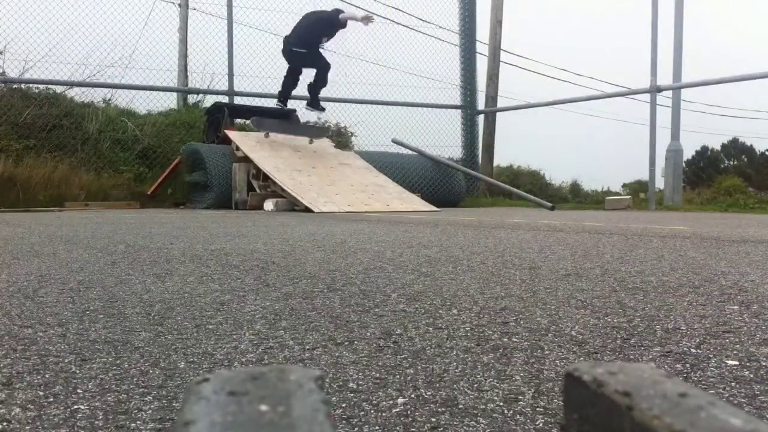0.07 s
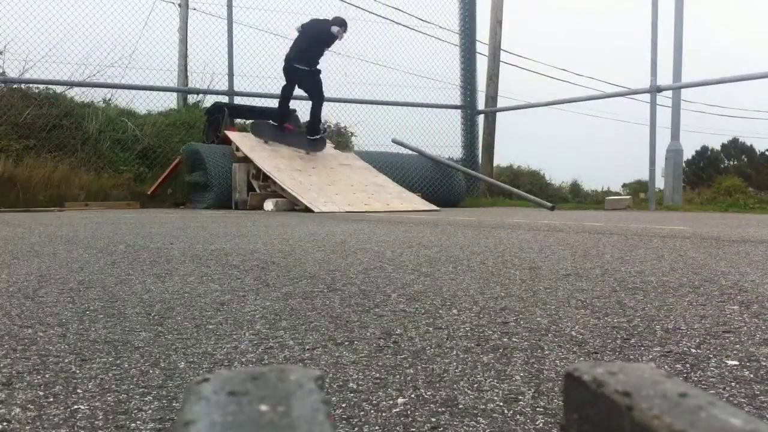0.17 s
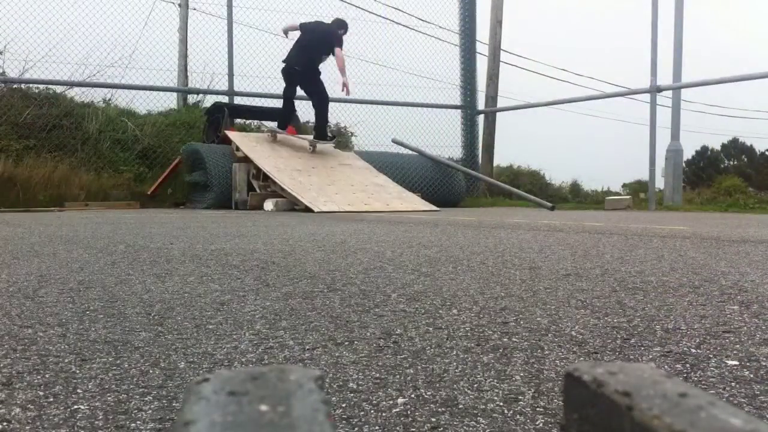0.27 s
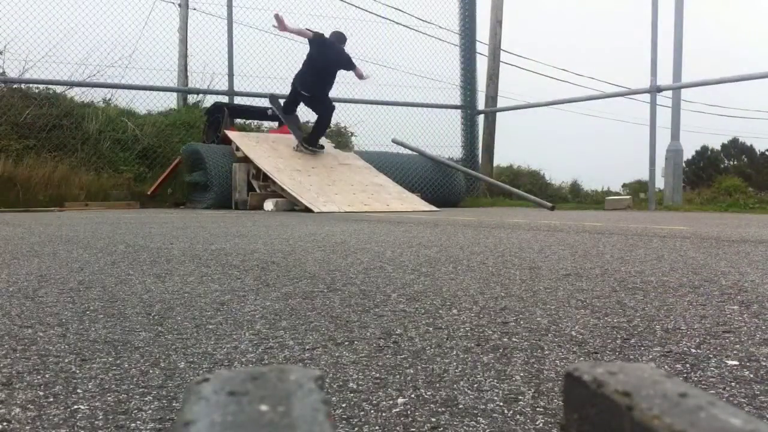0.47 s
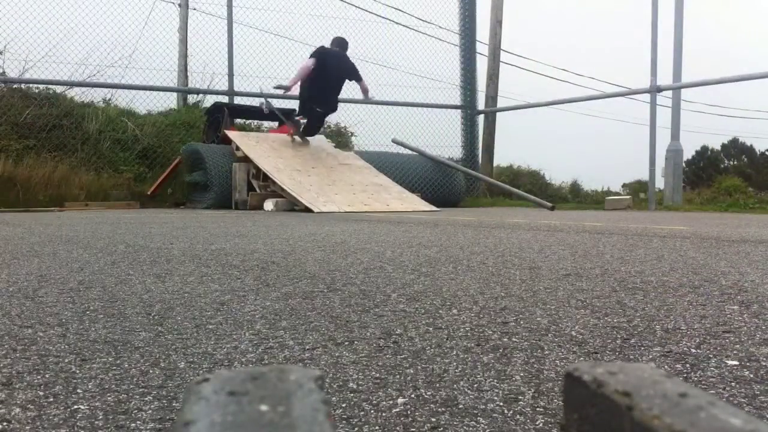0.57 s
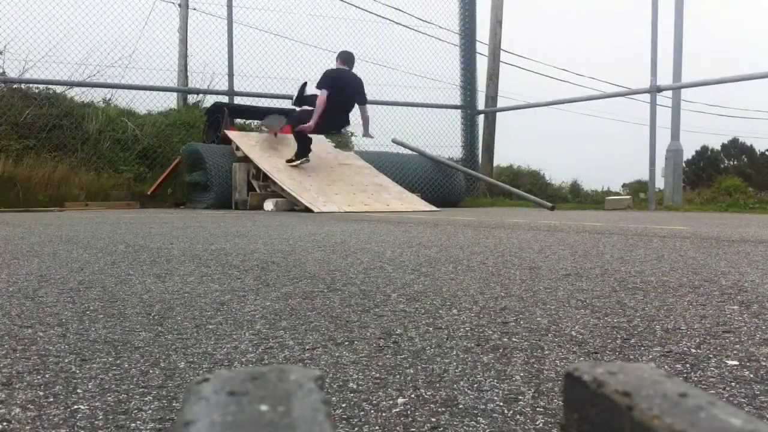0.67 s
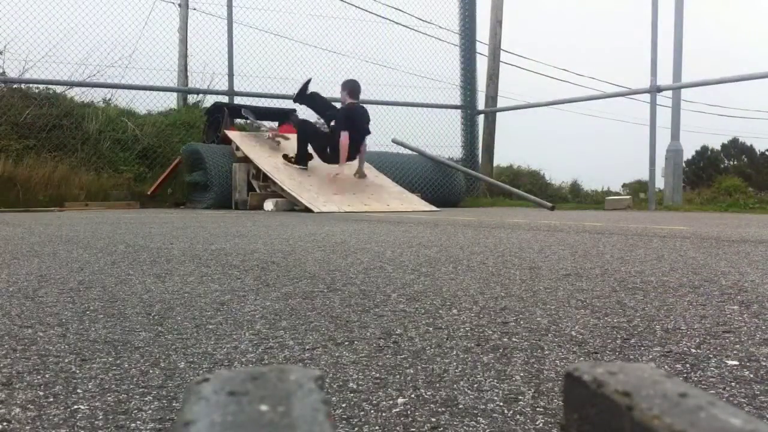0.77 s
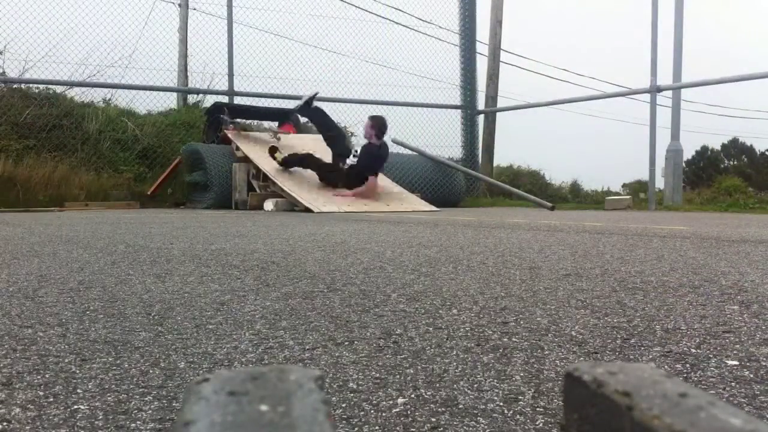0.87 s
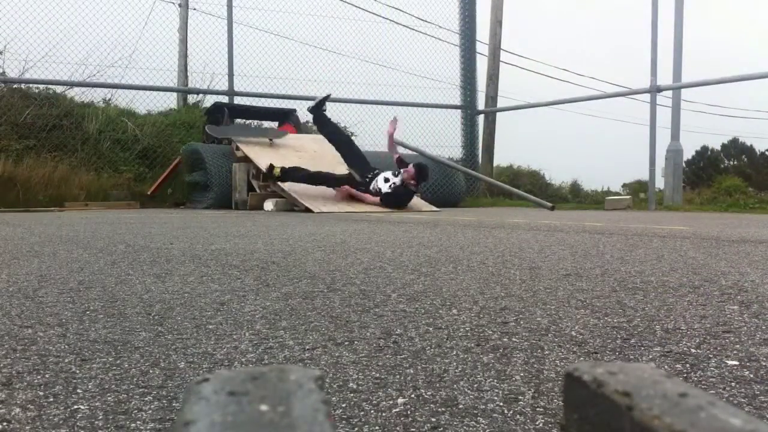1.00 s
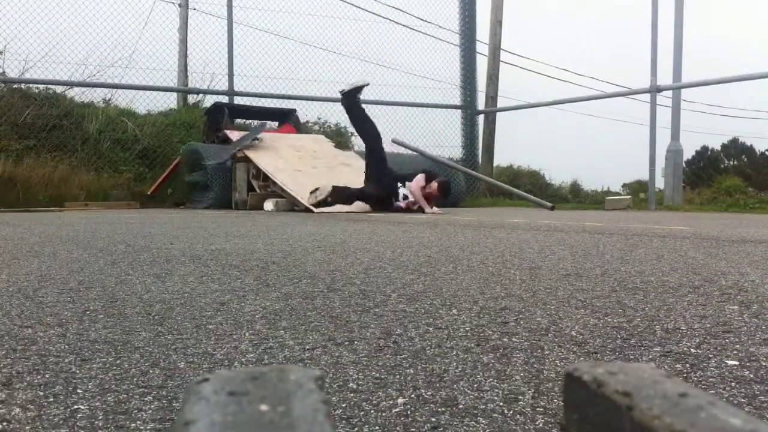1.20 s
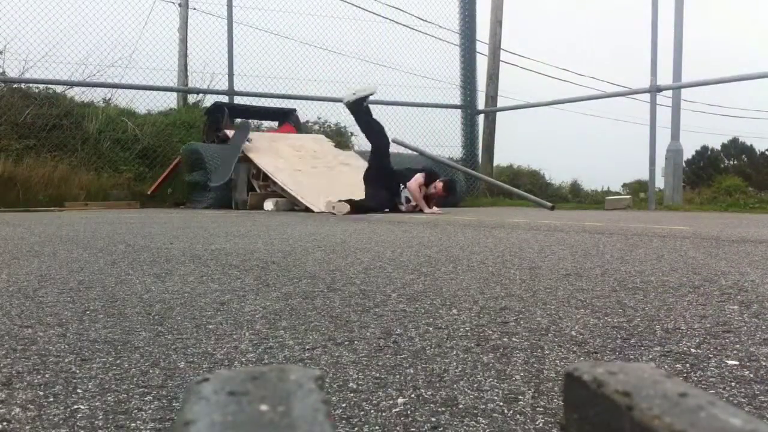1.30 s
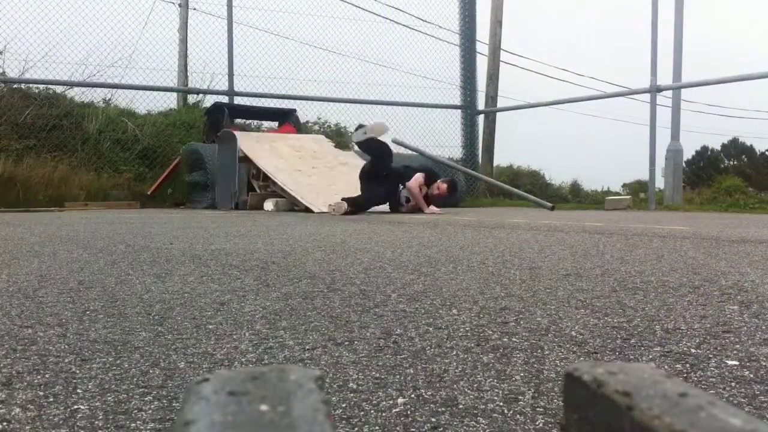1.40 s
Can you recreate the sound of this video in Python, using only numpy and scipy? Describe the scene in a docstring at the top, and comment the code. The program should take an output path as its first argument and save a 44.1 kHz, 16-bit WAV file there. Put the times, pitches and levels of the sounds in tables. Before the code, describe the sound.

A skateboard cracks onto a plywood ramp at about 0.2 seconds, after two faint ticks in quiet outdoor air. More sharp knocks follow until 0.6 seconds, with a brief wheel roll. From 0.8 to 1.1 seconds the board clatters and the skater's body thumps down the wood. Clothes scrape onto asphalt, with a few lighter clacks until about 1.4 seconds. The hits leave a faint echo.

```python
"""A skater lands a jump on a plywood ramp in an outdoor court, loses the board and falls.
First the board ticks faintly as it flies through the quiet air. Then wheels and deck crack against the
ramp and the body thumps down it. Each blow bends the wood, giving a short snap and a dense ring, and
the court sends back a faint tail. Wheels roll and clothes drag, ending in a slide onto the asphalt."""
import sys
import numpy as np
from scipy import signal
from scipy.fft import rfft, irfft, next_fast_len
from scipy.io import wavfile

SR = 44100
rng = np.random.default_rng(int(sys.argv[2]) if len(sys.argv) > 2 else 0)


def waveform_to_disk(signal):
    """Save audio, clipped to [-1, 1], as 16-bit WAV at the path in sys.argv[1]."""
    frames = np.transpose(np.atleast_2d(signal))
    scaled = np.clip(frames, -1, 1) * 32767
    samples = np.round(scaled).astype(np.int16)
    wavfile.write(sys.argv[1], SR, samples)


N = 63945

BAND_EDGES_HZ = np.r_[0, np.geomspace(110, SR / 2, 23)]   # about a third of an octave apart


def from_db(db):
    """Turn decibels into a number to multiply by."""
    return 10 ** (np.asarray(db) / 20)


def unit_level(x):
    """Scale a sound so that its average level (rms) is 1."""
    return x / np.sqrt(np.mean(x ** 2) + 1e-20)


def at_hz(table, hz, column=1):
    """Look up a value by frequency, gliding between the rows of a table."""
    table = np.array(table)
    return np.interp(np.log(np.maximum(hz, 1)), np.log(table[:, 0]), table[:, column])


def frequencies(size):
    """The frequencies in the spectrum of a sound this many samples long."""
    return np.arange(size // 2 + 1) * SR / size


def causal_filter(db):
    """A filter with these levels that lets nothing sound early (minimum phase)."""
    cepstrum = irfft(np.log(from_db(db)))
    half = len(cepstrum) // 2
    return np.exp(rfft(np.r_[cepstrum[0], 2 * cepstrum[1:half], np.zeros(half)]))


def coloured(x, colour):
    """Give a steady sound its balance of low and high, at an average level of 1."""
    size = 2 * next_fast_len(N)
    gain = from_db(at_hz(colour, frequencies(size)))
    return unit_level(irfft(rfft(x, size) * gain)[:N])


def local_level_db(spectrum, width=.16):
    """The average level around each frequency, over a span of about width times that frequency."""
    k = np.arange(len(spectrum))
    reach = (4 + k * width / 2).astype(int)
    low, high = np.maximum(k - reach, 0), np.minimum(k + reach + 1, len(k))
    energy = np.r_[0, np.cumsum(np.abs(spectrum) ** 2)]
    return 10 * np.log10((energy[high] - energy[low]) / (high - low) + 1e-12)


def noise_bands(size=65536):
    """A supply of white noise, split into bands from low to high."""
    hz, white = frequencies(size), rfft(rng.standard_normal(size))
    return irfft(white * (hz >= BAND_EDGES_HZ[:-1, None]) * (hz < BAND_EDGES_HZ[1:, None]))


def dying_noise(bands, size, fade_s_at, build_s_at):
    """Each band of noise swells, then drops 60 dB in its fade time; all get equal energy per Hz."""
    t, out = np.arange(size) / SR, 0
    start = rng.integers(bands.shape[1] - size)
    for band, low, high in zip(bands, BAND_EDGES_HZ, BAND_EDGES_HZ[1:]):
        centre = (low + high) / 2
        swell = 1 - np.exp(-t / build_s_at(centre))
        fade = np.exp(-np.log(1000) * t / fade_s_at(centre))
        gain = np.sqrt(2 * (high - low) / SR / size)
        out = out + gain * unit_level(band[start:start + size] * swell * fade)
    return out


def add(track, start_s, sound):
    """Mix a sound into the track at the given time."""
    start = int(start_s * SR)
    track[start:start + len(sound)] += sound[:N - start]


def outdoor_air(level_db=-57.5):
    """The quiet, steady hush of the outdoors."""
    # Each row: frequency in Hz, level in dB.
    colour = [(18, -59), (30, -25), (69, -24), (160, 5), (332, 7.5), (410, 0.5), (830, 1.5), (1080, -14.5),
              (1440, -0.5), (3780, -17.5), (15500, -28.5)]
    return from_db(level_db) * coloured(rng.standard_normal(N), colour)


def air_ticks(tones_hz=(1450, 1530), fade_s=.05):
    """The flying board gives faint metallic ticks, each made of two close tones."""
    # Each row: start in seconds, level in dB.
    ticks = [(.014, -47), (.138, -53)]
    out, t = np.zeros(N), np.arange(4096) / SR
    tones = sum(np.sin(2 * np.pi * hz * t) for hz in tones_hz)
    for start_s, db in ticks:
        add(out, start_s, from_db(db - 60 * t / fade_s) * tones)
    return out


def blow(bands, zone_db, ring_stretch, note_hz, note_db, snap_shares, press_s=0, size=8192):
    """One blow bends the plywood. Low waves travel slower, so the snap sweeps down; then it rings."""
    # The centres in Hz of five zones, low to high: thud, knock, crack, sizzle, fizz.
    zone_hz = [230, 750, 2600, 6300, 12500]
    # The tone colour of the ramp. Each row: frequency in Hz, level in dB.
    plywood = [(30, -9), (60, -8), (90, 11.5), (135, 24), (190, 27), (400, 24), (850, 28), (1250, 21.5),
               (2100, 24), (3300, 17.5), (4100, 7), (5200, -6), (8500, -14.5), (15000, -19)]
    # Peaks and hollows in the sound of every blow. Each row: centre in Hz, boost or cut in dB, width in Hz.
    resonances = [(179.2, 5, 10), (261.8, 3, 9.9), (366.6, 5, 25), (415.5, 6, 24.5), (509, 4, 64),
                  (732, 3, 59), (864, 2, 27), (1647, 2, 80), (1830, -13, 93), (2066, 1.5, 290),
                  (2553, -4, 334), (2810, 4, 310), (3264, 3, 520)]
    # How the wood rings. Each row: frequency in Hz, seconds to fade by 60 dB before stretching.
    ring_times = [(100, 0.13), (200, 0.2), (450, 0.1), (900, 0.11), (2000, 0.065), (3500, 0.023),
                  (7000, 0.09), (14000, 0.21)]
    bend_lag_s, build_cycles = 0.001304, 0.37   # the snap's delay at 1 kHz; the ring's swell time
    hz = frequencies(size)
    snap = np.exp(-4j * np.pi * bend_lag_s * np.sqrt(1000 * hz))
    ring = dying_noise(bands, size, fade_s_at=lambda f: ring_stretch * at_hz(ring_times, f),
                       build_s_at=lambda f: press_s + build_cycles / f)
    share = np.clip(at_hz(snap_shares, hz), 0, 1)
    strike = np.sqrt(share) * snap + np.sqrt(1 - share) * rfft(ring)
    db = at_hz(plywood, hz) + at_hz(list(zip(zone_hz, zone_db)), hz)
    db -= local_level_db(strike)   # even out the strike's chance bumps
    struck_note = (note_hz, note_db, note_hz / 3.16)   # about half an octave wide
    for centre, boost, width in [*resonances, struck_note]:
        db += boost / (1 + (2 * (hz - centre) / width) ** 2)
    fade = np.minimum(1, np.linspace(2, 0, size))
    return fade * irfft(strike * causal_filter(db))


def board_knocks(bands):
    """Hard wheels, axles and deck hit the ramp and the ground."""
    # Each row: start in seconds, then thud, knock, crack, sizzle and fizz in dB, a factor that
    # stretches the ring, the note of the struck spot in Hz, that note's boost in dB.
    knocks = [ (0.2073, 1, -15, -15.5, -7.5, 1.5, 2.4, 1490, 16.5),
              (0.2167, -2, -7.5, -29, 0, -14, 0.29, 3640, -5),
              (0.2284, -6, -3, -9.5, -20, -12, 0.8, 2350, 7),
              (0.298, -34, -34, -38, -47, -28, 1.3, 2300, 11),
              (0.3324, -2.5, 2.5, 1, 6.5, 3.5, 0.72, 1680, -1.5),
              (0.403, -36, -25, -37, -42, -24, 1.6, 2000, -11),
              (0.409, -11.5, -16, -28, -19, -26, 0.93, 393, 5.5),
              (0.5109, -4, -1, -7, -0.5, -1.5, 0.43, 1020, 4.5),
              (0.542, -3, -11, -27, -31, -20.5, 0.64, 600, 1.5),
              (.5845, -8, -8, -5.5, 2, -11, 0.49, 1560, 4),
              (0.7787, -4, -11.5, -15, 1.5, -11.5, 0.96, 3970, 8.5),
              (0.806, -0.5, -14, -18.5, -51, -32, 0.6, 4000, -25),
              (0.8247, -2, -2.5, -12.5, 6, -6, 0.34, 900, 8), (.8288, 2, -0.5, 0.5, 4.5, 5, 0.85, 465, 6.5),
              (0.9, -11.5, -12.5, -24.5, -35, -24, 2.2, 1120, -1.5),
              (0.9401, -0.5, -10.5, -19, -29, -31, 0.82, 3730, 3),
              (0.9606, 0, -9, -18, -8, -35, 1.25, 624, 0.5),
              (0.9816, -2, -9.5, -13, 1, -13, 1.28, 1370, 7.5),
              (1.0594, -14.5, -7, -21, -10, -0.5, 0.6, 398, 9.5),
              (1.1691, -21, -22, -38.5, -13, -14, 0.25, 1650, 12),
              (1.297, -42, -45, -34, -11, -11, 1.8, 3460, -17),
              (1.3425, -19, -20, -52, -17, -13, 0.85, 375, 6),
              (1.3492, -22, -23.5, -33.5, -13, -31, 0.29, 1540, 13.5)]
    # Each row: frequency in Hz, share of a hard blow's energy that is in its snap (0 to 1).
    snap_shares = [(150, 0.16), (800, 0.11), (3000, 0.5), (10000, 0.12)]
    out = np.zeros(N)
    for start_s, *zone_db, ring_stretch, note_hz, note_db in knocks:
        add(out, start_s, blow(bands, zone_db, ring_stretch, note_hz, note_db, snap_shares))
    return out


def body_thumps(bands):
    """Feet, hip, back and limbs press in softly and flex the whole sheet, with little treble."""
    # Each row: start in seconds, thud in dB, slap in dB, a factor that stretches the ring,
    # the note of the flexing sheet in Hz, that note's boost in dB.
    thumps = [(0.2112, -2.5, -19, .8, 275, 17.5), (0.2342, 4, -10.5, 1.13, 312, 11.5),
              (.2465, -1, -5, 1.07, 128, 9), (.3180, -4, -17.5, 1.3, 805, 11),
              (.3530, -0.5, -7.5, 0.51, 112, 3), (.5160, -1, -11, 1.1, 192, 7),
              (0.846, -3, -6, 1.43, 407, 2), (0.9474, 1.5, -8, 1.5, 126.6, 8),
              (.9920, -5.5, -14, 0.94, 434, 5), (1.029, -3, -25, 1.3, 140, 8),
              (1.0820, -5, -23, 0.83, 238, 1)]
    # Each row: frequency in Hz, share of a soft blow's energy that is in its snap (0 to 1).
    snap_shares = [(130, 0.87), (350, 0.34), (900, 0.07), (4000, 0.26)]
    out = np.zeros(N)
    for start_s, thud, slap, ring_stretch, note_hz, note_db in thumps:
        zone_db = [thud, slap, slap - 15, slap + 0.5, slap - 24]   # the top three follow the slap
        thump = blow(bands, zone_db, ring_stretch, note_hz, note_db, snap_shares, press_s=0.005)
        add(out, start_s, thump)
    return out


def slide(grains_per_s=2000, spread_db=3):
    """Rolling wheels and dragging clothes make a stream of tiny contacts of uneven size."""
    # Each row: time in seconds, level in dB.
    loudness = [(.2, -88), (0.229, -27), (.31, -66), (.39, -47), (.49, -56), (.62, -36.5), (.76, -70),
                (.87, -33.5), (.93, -36.5), (.96, -36.5), (.995, -26), (1.02, -42), (1.12, -42),
                (1.2, -51.5), (1.236, -47.5), (1.32, -54.5), (1.369, -43.5), (1.40, -49), (1.44, -40.5)]
    # Each row: frequency in Hz, level in dB.
    colour = [(50, -12), (140, 3), (300, 4.5), (700, 3.5), (1200, -8.5), (3200, -12), (5000, -21.5),
              (15000, -38)]
    sizes = from_db(spread_db * np.minimum(rng.exponential(1, N), 4))
    signs = rng.choice([-1, 1], N)
    grains = sizes * signs * (rng.random(N) < grains_per_s / SR)
    level_db = np.interp(np.arange(N) / SR, *np.transpose(loudness))
    return coloured(grains, colour) * from_db(level_db)


def court_tail(sound, bands, size=49152):
    """Scattered sound comes back from fence, bank and trees."""
    # Each row: frequency in Hz, level in dB compared with the direct sound, seconds to fade by 60 dB.
    echoes = [(79, -23, 1), (184, -14, 1), (413, -21, 0.43), (900, -20.5, 0.92), (2000, -19.5, 0.49),
              (3100, -24.5, 0.8), (4880, -15.5, .8), (12000, -9.5, 1)]
    tail = dying_noise(bands, size, lambda f: at_hz(echoes, f, column=2), build_s_at=lambda f: 0.01)
    colour = causal_filter(at_hz(echoes, frequencies(size)))
    return signal.fftconvolve(sound, irfft(rfft(tail) * colour))[:N]


def scene():
    """The fall, its tail and the outdoor air, in one channel."""
    bands = noise_bands()
    fall = board_knocks(bands) + body_thumps(bands) + slide() + air_ticks()
    air = outdoor_air()
    return (fall + court_tail(fall, noise_bands()) + air)[None]


def record(dry):
    """Round off the loudest peaks and cut the very highest treble."""
    ceiling, cutoff_hz = .93, 16200
    rounded = dry / (1 + (dry / ceiling) ** 4) ** (1 / 4)
    low_pass = signal.ellip(10, .1, 80, cutoff_hz, fs=SR, output="sos")
    return signal.sosfilt(low_pass, rounded)


dry = scene()
out = record(dry)
waveform_to_disk(out)
```